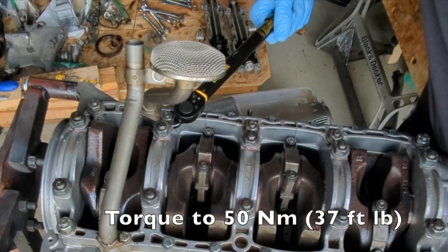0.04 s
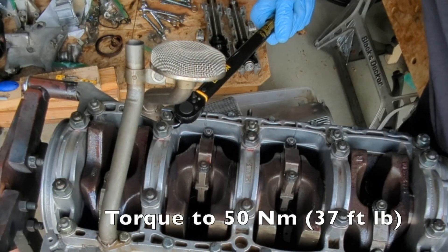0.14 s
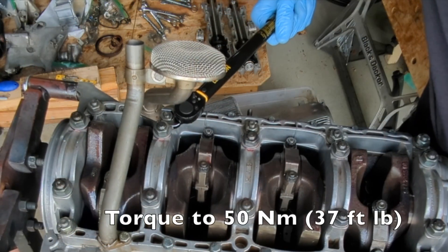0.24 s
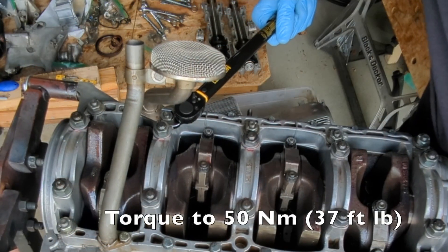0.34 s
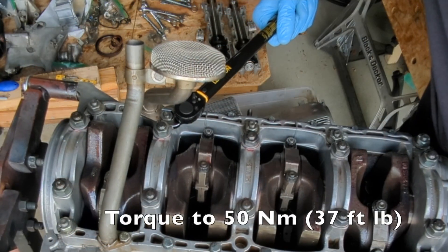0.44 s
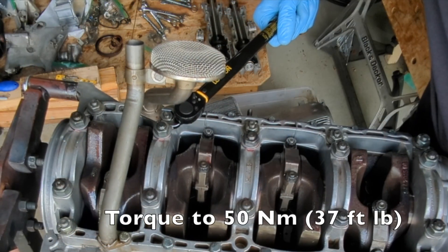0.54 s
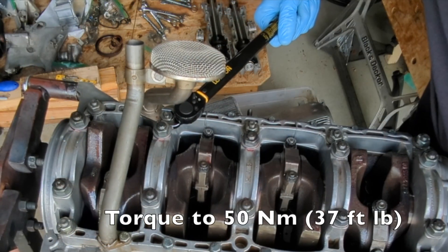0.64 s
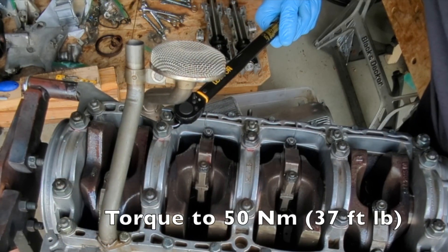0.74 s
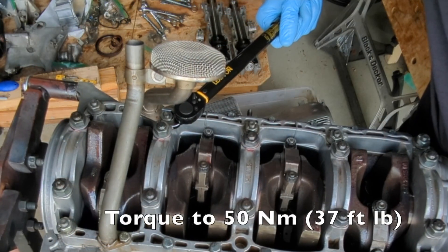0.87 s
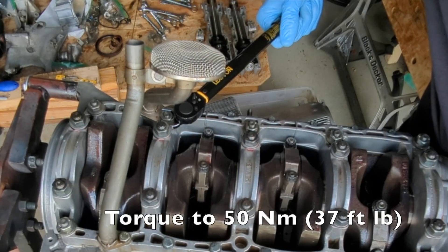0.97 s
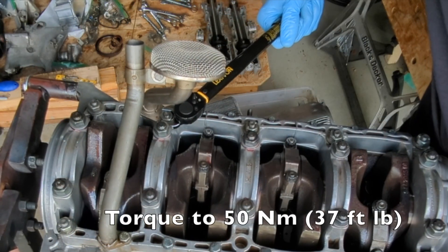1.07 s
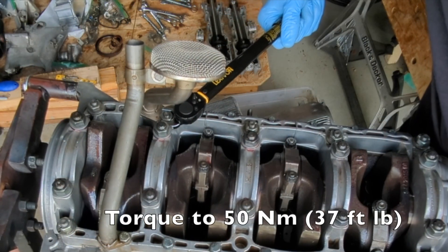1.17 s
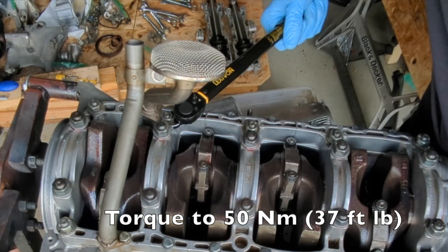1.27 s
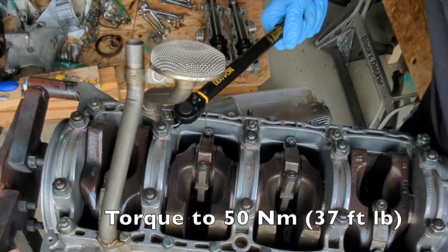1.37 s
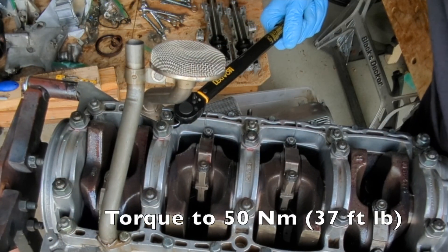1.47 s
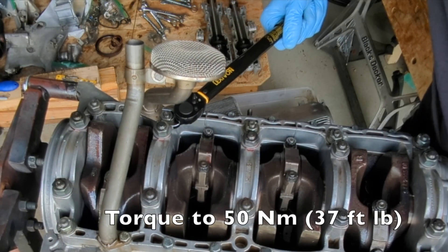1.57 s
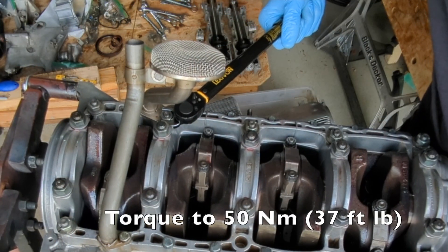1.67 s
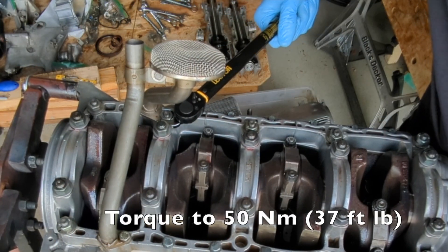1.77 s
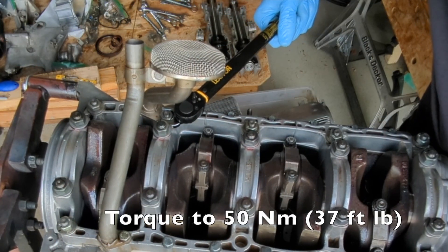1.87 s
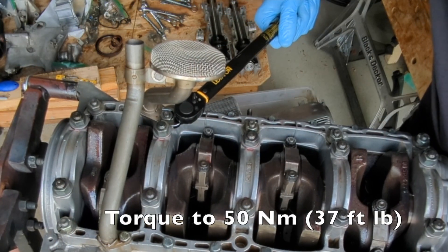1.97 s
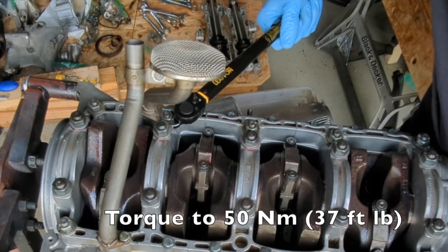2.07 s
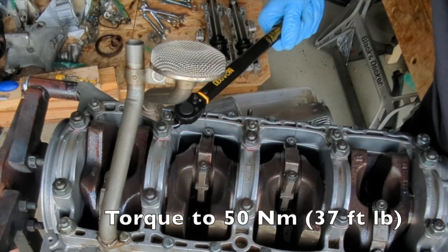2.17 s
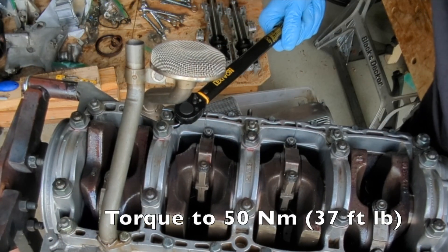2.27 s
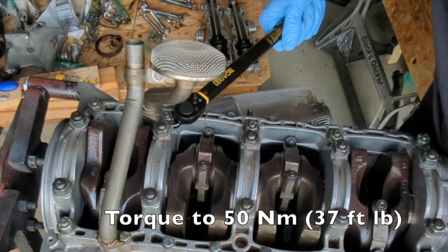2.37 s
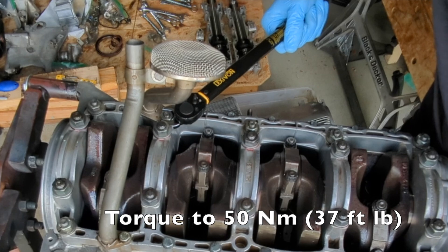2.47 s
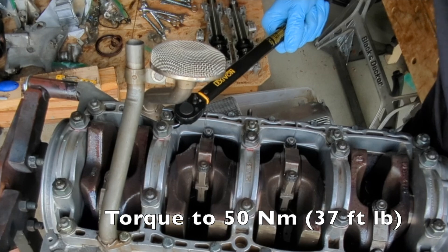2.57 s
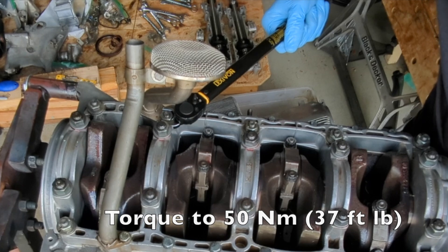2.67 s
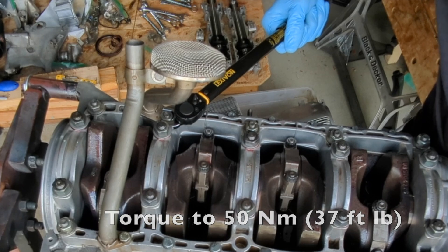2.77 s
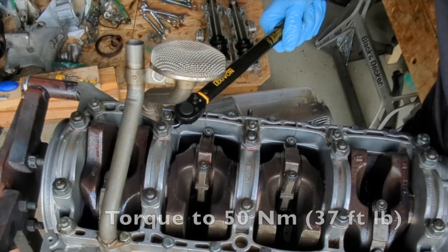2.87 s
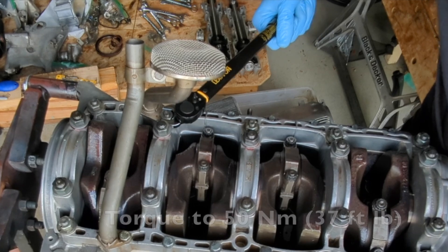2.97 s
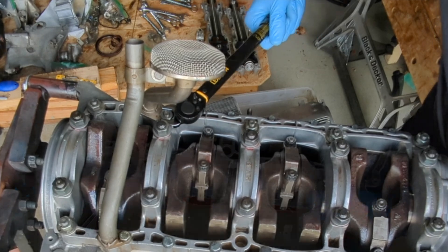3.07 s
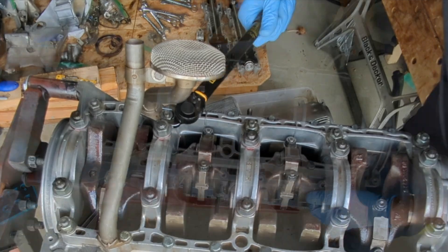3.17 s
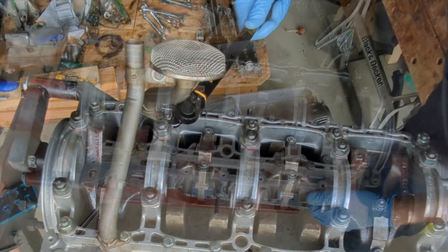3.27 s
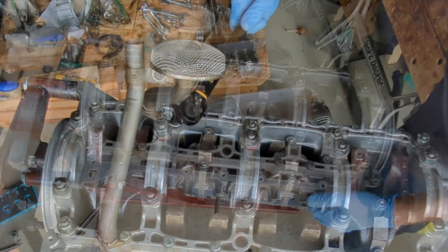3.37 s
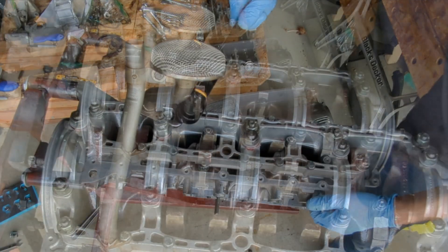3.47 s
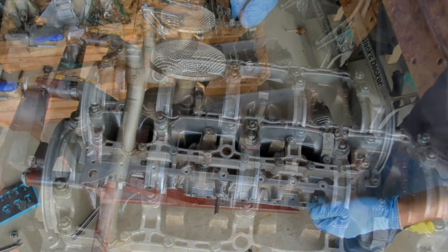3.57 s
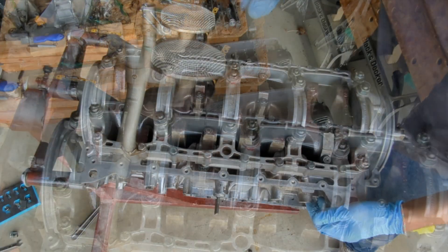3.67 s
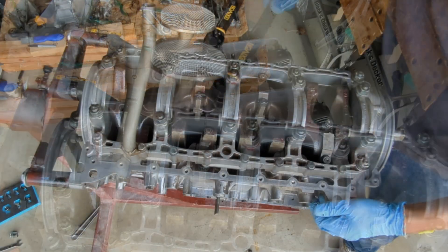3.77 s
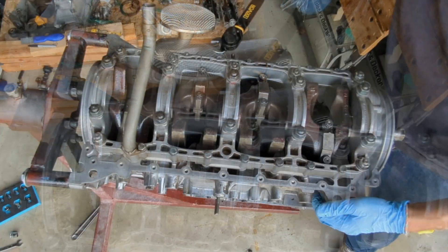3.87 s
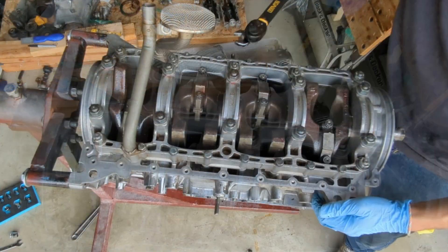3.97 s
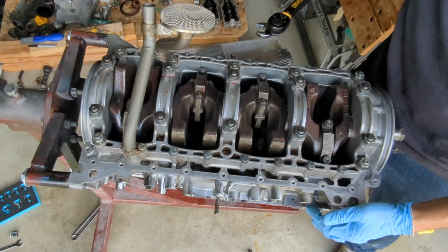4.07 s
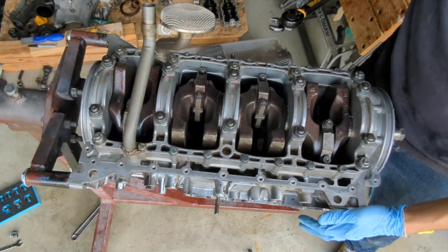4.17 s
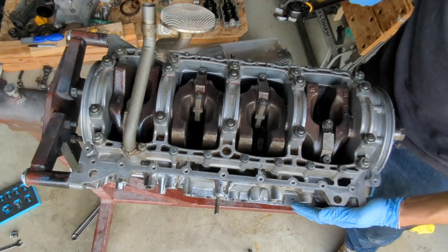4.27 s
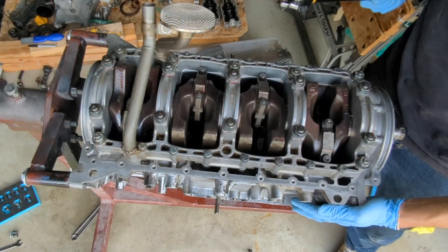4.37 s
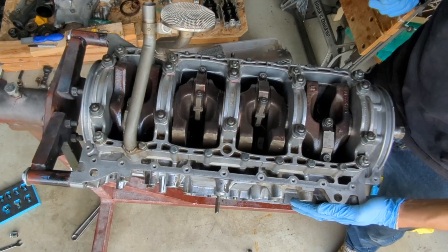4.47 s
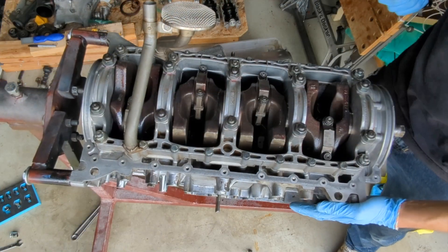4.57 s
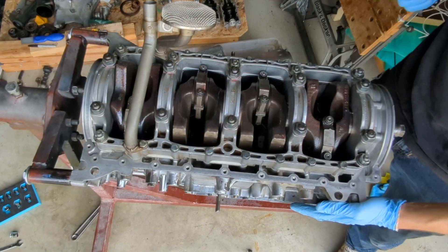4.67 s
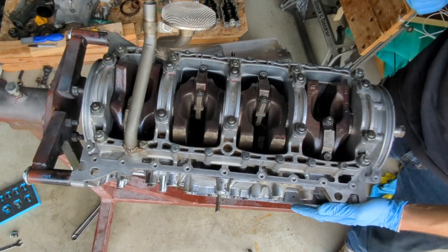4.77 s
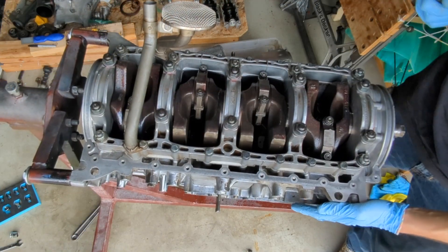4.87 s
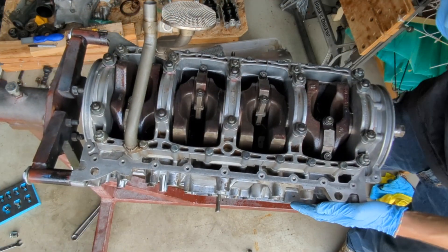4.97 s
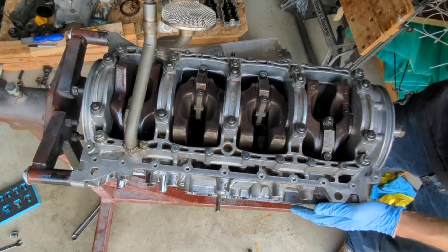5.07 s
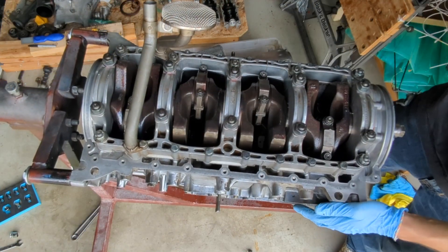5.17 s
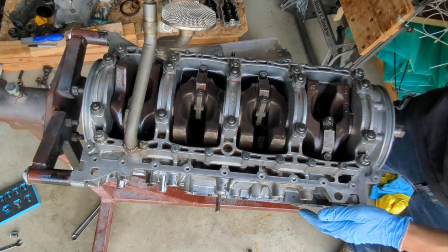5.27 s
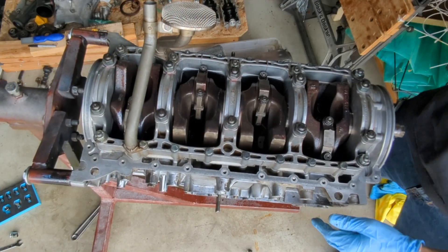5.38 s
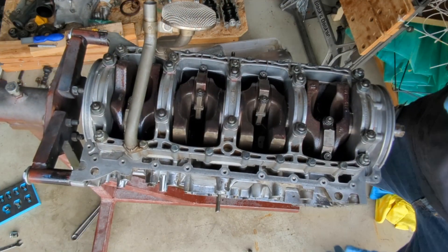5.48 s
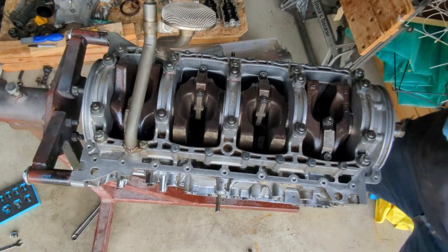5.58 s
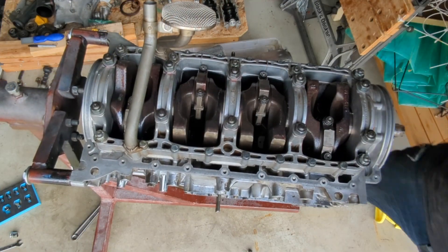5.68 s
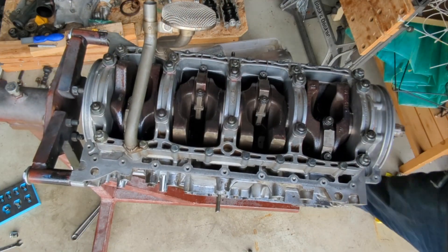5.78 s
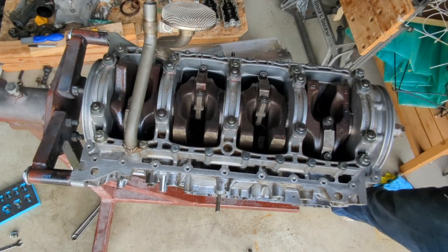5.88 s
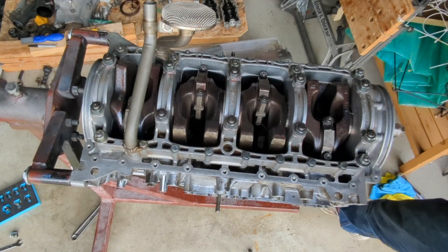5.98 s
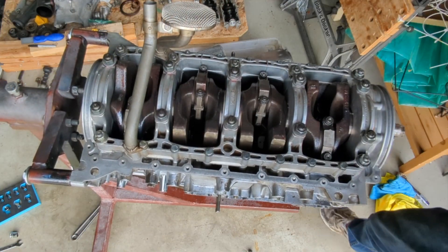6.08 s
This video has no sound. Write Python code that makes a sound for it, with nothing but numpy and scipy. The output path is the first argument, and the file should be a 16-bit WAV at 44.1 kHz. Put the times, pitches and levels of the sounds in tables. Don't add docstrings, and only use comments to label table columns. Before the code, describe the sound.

A low machine hum beats slowly beneath soft rumble and air noise. After a faint dull knock, a torque wrench on an engine block, close and to the right, snaps twice about a second apart, each crack bright with a short metallic ring and a soft dull reset. Then gloves and clothing scuff, small parts tick, and low knocks and shoe scrapes end it, in a modestly echoing workshop.

```python
import sys
import numpy as np
from scipy import signal
from scipy.io import wavfile
from scipy.ndimage import uniform_filter1d

SR = 44100
rng = np.random.default_rng(int(sys.argv[2]) if len(sys.argv) > 2 else 0)


def transcribe(u):
    v = np.clip(np.atleast_2d(u).T, -1, 1)
    q = np.round(v * 32767).astype(np.int16)
    wavfile.write(sys.argv[1], SR, q)


def to_linear_factor(level_db):
    exponent = np.asarray(level_db, float) / 20
    return 10 ** exponent


N = 270333


def evened(x):
    return x / np.sqrt(np.mean(x ** 2) + 1e-20)


def struck(x):
    return x / np.sqrt(np.mean(x[..., :350] ** 2))


def read(points, hz):
    f, value = np.transpose(points)
    return np.interp(np.log(hz + 1), np.log(f + 1), value)


def add(mix, start_s, sound):
    part = mix[:, round(start_s * SR):][:, :sound.shape[1]]
    part += sound[:, :part.shape[1]]


def lean(pan_db):
    return to_linear_factor(np.array([[pan_db / 2], [-pan_db / 2]]))


def colour(x, *spectra):
    hz = abs(np.fft.fftfreq(4096, 1 / SR))
    gain_db = sum(read(s, hz) for s in spectra)
    log_gain = np.log(to_linear_factor(np.maximum(gain_db, -100)))
    taps = np.fft.ifft(np.exp(np.conj(signal.hilbert(log_gain)))).real[:2048]
    return signal.oaconvolve(x, taps)[:len(x)]


def colour_both(x, *spectra):
    return np.array([colour(v, *spectra) for v in x])


def resonate(x, hz, width):
    r = np.exp(-np.pi * width / SR)
    feedback = [1, -2 * r * np.cos(2 * np.pi * hz / SR), r * r]
    return signal.lfilter([(1 - r * r) / 2, 0, (r * r - 1) / 2], feedback, x)


def resonate_twice(x, hz, width):
    return resonate(resonate(x, hz, width), hz, width)


def wander(rate):
    t = np.arange(0, N + 256, 256) / SR
    rates = np.geomspace(rate / 10, rate, 12)
    slow = sum(np.sin(2 * np.pi * (f * t + rng.random())) / np.sqrt(f) for f in rates)
    return np.interp(np.arange(N) / SR, t, evened(slow))


def burst(t, rise, t60):
    return rng.standard_normal((2, len(t))) * (1 - np.exp(-t / rise)) * to_linear_factor(-60 * t / t60)


# (time [s], speed [Hz])
MOTOR_SPEED = [(0, 58.585), (1.9, 58.585), (2.1, 58.7), (6.13, 58.7)]
# (multiple of shaft speed, level [dB])
MOTOR_TONES = [(1, -67.5), (3, -78.5), (4, -75.5), (5, -80), (6, -82), (8, -82.5), (9, -81.5), (10, -86),
               (11, -82.5)]


def hum():
    t = np.arange(N) / SR
    shaft_turns = np.cumsum(np.interp(t, *np.transpose(MOTOR_SPEED))) / SR + .334
    apart = np.array([[.012], [-.012]])
    mains_hz, mains_turn, mains_db = 119.94, .18, -51.3
    out = to_linear_factor(mains_db) * np.cos(2 * np.pi * (mains_hz * t + mains_turn + apart))
    throb_db = -61.5 + 4 * np.cos(2 * np.pi * (t - 1.2) / 1.5)
    out += to_linear_factor(throb_db) * np.cos(2 * np.pi * (2 * shaft_turns - apart))
    for k, db in MOTOR_TONES:
        level = to_linear_factor(db + 2.0 * wander(1.5))
        turns = k * shaft_turns + 0.078 * wander(.8) + rng.random()
        out += level * np.cos(2 * np.pi * turns)
    return np.sqrt(2) * out * lean(-.3)


# (pitch [Hz], likeness [-1 to 1])
LIKENESS = [(60, 0.97), (130, 0.98), (290, 0.84), (640, 0.27), (1410, -0.19), (3100, 0.08), (6820, -0.01),
            (15000, 0.03)]
# (pitch [Hz], left minus right [dB])
BALANCE = [(60, -1.0), (180, -0.5), (550, -1.5), (1650, -2.0), (4970, -4.0), (15000, -2.5)]


def diffuse(spectra, patchy_db):
    hz = np.fft.rfftfreq(2048, 1 / SR)
    a, b, c, d, patches = rng.standard_normal((N // 512 + 5, 1025, 5)).T
    patches = uniform_filter1d(patches, size=15, axis=0)
    patches = evened(uniform_filter1d(patches, size=6, axis=1))
    same = np.clip(read(LIKENESS, hz), -1, 1)[:, None]
    left = a + 1j * b
    right = same * left + np.sqrt(1 - same ** 2) * (c + 1j * d)
    z = np.array([left * to_linear_factor(read(BALANCE, hz))[:, None], right])
    power = sum(to_linear_factor(read(s, hz)) ** 2 for s in spectra)
    z *= np.sqrt(power)[:, None] * to_linear_factor(patchy_db * patches)
    return evened(signal.istft(z, nperseg=2048, noverlap=1536)[1][:, :N])


# (pitch [Hz], level [dB per Hz])
RUMBLE = [(20, -36), (32, -22), (46, -19), (58, 3), (67, -1), (77, -1.5), (88, 4), (104, -0.5), (140, -7.5),
          (175, -4.5), (205, -14), (260, -24), (400, -57.5)]
# (pitch [Hz], level [dB per Hz])
AIR = [(200, -38.5), (300, -34), (450, -24.5), (800, -15.5), (1200, -19.5), (1600, -28.5), (2600, -39),
       (5000, -47), (9000, -56.5), (14000, -58)]


def workshop_air():
    return to_linear_factor(-57) * diffuse([RUMBLE, AIR], 0.27)


# (time [s], level [dB], brightness [dB])
OUTSIDE = [(0, -69.5, -4), (.6, -65.5, -7.5), (1.2, -62.5, -7.5), (1.999, -62.5, -4.5),
           (2.801, -60.5, -7.5), (3.7, -60, -1), (4.2, -60, -6.5), (5, -61, 1), (5.6, -58, -3),
           (6.13, -60.5, 0)]
# (pitch [Hz], level [dB per Hz])
WASH = [(160, -39), (270, -11.5), (469, -1.5), (660, -8.5), (688, -9.5), (967, -5.5), (1160, -11.5),
        (1250, -7.5), (2760, -18), (8000, -37.5), (10400, -75), (17600, -120)]


def wash():
    time_s, *curves = np.transpose(OUTSIDE)
    level_db, bright_db = (np.interp(np.arange(N) / SR, time_s, c) for c in curves)
    far = diffuse([WASH], 1.2)
    low = signal.sosfilt(signal.butter(2, 1500, fs=SR, output="sos"), far)
    return to_linear_factor(level_db) * (low + to_linear_factor(bright_db) * (far - low))


# (pitch [Hz], level [dB])
HISS = [(1000, -81), (6000, -93.5), (10000, -89.5), (13200, -89), (13700, -108), (16500, -125)]


def camera_noise(shape):
    t = np.arange(60) / SR
    leak = colour_both(rng.standard_normal(shape), HISS)
    for s in np.arange(.1558, N / SR, .16):
        tick = resonate_twice(burst(t, .0002, .006), 11300, 5000)
        add(leak, s, to_linear_factor(-81) * evened(tick))
    return leak


# (time [s], level [dB], main pitch [Hz], t60 [s], left minus right [dB])
TICKS = [(3.059, -67, 5660, 0.017, -12), (3.278, -55, 2030, 0.045, -3.5), (3.37, -57.5, 7900, 0.016, -10),
         (3.372, -46.5, 2020, 0.017, -4), (3.409, -67, 4500, .02, -5.5), (3.5057, -54, 3170, 0.018, -14),
         (4.096, -74.5, 9900, 0.025, -10.5), (4.228, -63.5, 5750, 0.021, -12),
         (4.8106, -50, 2400, 0.037, -5), (4.884, -60.5, 6000, 0.018, -13), (4.885, -53, 1780, .03, -7),
         (5.608, -54, 5860, 0.013, -13), (5.757, -66, 9550, 0.048, -2)]
# (time [s], level [dB], main pitch [Hz], t60 [s], left minus right [dB])
KNOCKS = [(.365, -56, 700, 0.031, -1), (3.713, -47.5, 530, .07, -8), (3.73, -51, 560, 0.038, 0),
          (5.464, -45.5, 1270, 0.071, -1), (5.6021, -41.5, 494, 0.056, -2), (5.603, -46.5, 1870, 0.021, 2),
          (5.62, -45, 1190, 0.044, 1), (5.69, -48, 374, 0.057, -2), (5.66, -55, 218, 0.27, 0),
          (5.755, -51, 264, 0.22, 0), (5.9, -51.5, 282, 0.4, -1), (6.01, -52, 240, 0.32, -1),
          (5.762, -46, 483, .06, -2), (5.769, -51, 1310, 0.036, -5)]


def ticks():
    out, t = np.zeros((2, N)), np.arange(4000) / SR
    for s, db, hz, t60, pan_db in TICKS + KNOCKS:
        touch = burst(t, .0002, t60)
        touch = touch + 0.58 * touch[::-1]
        edge = resonate_twice(touch, 8000, 6500)
        body = resonate_twice(touch, hz, 0.48 * hz)
        edge_db = -2.5 + 12 * min(np.log2(hz / 6500), 0)
        contact = body / abs(body).max() + to_linear_factor(edge_db) * edge / abs(edge).max()
        add(out, s, to_linear_factor(db - 1) * lean(pan_db) * contact)
    return out


# (pitch [Hz], t60 [s])
ECHO = [(500, 0.21), (1300, 0.56), (3000, 0.47), (5500, 0.34), (11000, 0.23)]


def shop(x):
    taps = np.zeros((2, SR // 2))
    slots = np.arange(180, SR // 2 - 20, 20)
    at = slots + rng.integers(0, 20, (2, len(slots)))
    np.put_along_axis(taps, at, rng.choice([-1., 1.], at.shape), 1)
    hz, t, z = signal.stft(taps, SR, nperseg=256)
    fade = to_linear_factor(-60 * t / read(ECHO, hz)[:, None])
    tail = signal.istft(z * fade, SR, nperseg=256)[1]
    return signal.fftconvolve(x, tail / np.linalg.norm(tail[0]), axes=1)[:, :N]


# (pitch [Hz], level [dB])
SHADOW = [(60, -0.5), (150, -1.0), (380, -1.5), (950, -3.5), (2380, -5.5), (5980, -9.5), (15000, -9.5)]
# (pitch [Hz], level [dB])
CAPSULE = [(12500, 0), (13500, -1), (14300, -11), (15700, -18), (16500, -30)]


def ports(x):
    return np.array([colour(x[0], SHADOW, CAPSULE), colour(x[1], CAPSULE)])


SLIP_S = .0016
# (pitch [Hz], width [Hz], level [dB])
HEAD = [(1100, 150, -10), (2900, 150, -2), (3330, 120, 0), (3680, 130, -4), (4610, 200, -9), (5240, 90, -9),
        (5470, 110, -7), (7310, 110, -2), (8320, 110, -10), (9220, 110, -13), (10200, 110, -9),
        (10900, 300, -8), (12200, 90, -8), (12900, 130, -7)]
# (pitch [Hz], level [dB], t60 [s])
BLOCK = [(330, -10, .2), (430, -9, .22), (530, -12, .2), (1090, -9, .2), (1236, -8, .35), (1292, -6, .45),
         (1500, -12, .2), (1825, -15, .3), (2630, -9, .3), (2810, -6, .4), (2952, -4, .45), (3082, -5, .55),
         (3216, -4, .46), (3338, -2, .38), (3367, -5, .45), (3560, -8, .3), (3595, -3, .25),
         (3711, -4, .25), (4005, -11, .2), (4500, -12, .2), (5243, -14, .28), (5319, -15, .28),
         (6150, -13, .22), (7233, -4, .14), (7477, -10, .22), (8516, -15, .2), (10040, -13, .18),
         (11480, -13, .2), (12145, -4, .1), (12800, -10, .12)]
# (pitch [Hz], level [dB per Hz])
CRACK = [(120, -39), (250, -17), (550, -19), (1080, -1.5), (1900, -9.5), (2550, -12), (3310, 5.5),
         (4040, -7.5), (5420, -5), (6400, -11), (7300, -4), (9000, -11), (12600, -8.5), (15000, -16.5)]


def snap(blow_db, tilt_db, ring_db):
    t = np.arange(round(.6 * SR)) / SR
    late = np.maximum(t - SLIP_S, 0)
    crack = colour_both(burst(late, 0.0006, 0.038), CRACK, [(2000, 0), (12000, tilt_db)])
    chatter = burst(t, 0.0022, 0.038)
    tick = burst(late, .0001, 0.0076) + to_linear_factor(-14.5) * chatter
    tick = resonate_twice(tick, 12500, 5000)
    swing = burst(late, .001, .016)
    head = sum(to_linear_factor(db) * resonate(swing, hz, 1.4 * width) for hz, width, db in HEAD)

    hz, db, t60 = np.transpose(BLOCK)[:, :, None]
    spread_db = 1.5 * rng.standard_normal((2, len(hz), 1))
    start = rng.random(hz.shape) + np.minimum(hz / 1500, 1) * rng.random(spread_db.shape)
    fade = to_linear_factor(db + spread_db - 60 * late / (0.75 * t60))
    modes = fade * np.sin(2 * np.pi * (hz * late + start))
    ring = modes.sum(1) * (1 - np.exp(-late / 0.0029))

    blow = struck(crack) + to_linear_factor(-3.0) * struck(head) + to_linear_factor(-7.0) * struck(tick)
    return ports(to_linear_factor(blow_db) * blow + to_linear_factor(ring_db) * ring)


# (pitch [Hz], level [dB per Hz])
RESET = [(250, -7), (450, 1.5), (1100, 4), (2200, -3), (3200, -5.5), (4000, -15), (4600, -25), (9000, -38),
         (14000, -55)]


def reset(db):
    knock = burst(np.arange(4000) / SR, 0.00042, 0.048)
    knock = colour_both(knock + .5 * knock[::-1], RESET)
    return to_linear_factor(db) * ports(struck(knock))


# (time [s], blow [dB], treble tilt [dB], ring [dB])
SNAPS = [
    (1.2380, -23.5, 3, -38.5),
    (2.4630, -23.5, 2, -39.5),
]
# (time [s], level [dB])
RESETS = [
    (1.7141, -50.5),
    (1.723, -57.5),
    (1.7316, -59),
    (2.8924, -49.5),
    (2.8988, -53),
    (2.912, -60),
]


def wrench():
    out = np.zeros((2, N))
    for s, *row in SNAPS:
        add(out, s - SLIP_S, snap(*row))
    for s, db in RESETS:
        add(out, s, reset(db))
    return out


# (pitch [Hz], level [dB per Hz])
GRIT = [(600, -42), (1100, 2.5), (1700, 5), (2400, 1), (3300, -2.5), (4800, -7), (6000, -23.5), (9000, -30)]
# (pitch [Hz], level [dB per Hz])
FINE = [(2500, -22), (4000, -0.5), (5200, 0.5), (6500, 2), (8000, -4), (9500, 0), (12000, -2.5),
        (14000, -9), (15650, -7), (15950, -43)]


def scuff(stroke, press_db, grit_hz, fine_db, pan_db, body_db, tint):
    catches = to_linear_factor(1.4 * np.repeat(np.minimum(rng.exponential(1, SR // 60), 3), 60))
    slips, fibres = (rng.standard_normal((2, 2, SR)) * catches)[..., :len(stroke)]
    slips = slips + 0.046 * slips[::-1]
    broad = evened(colour_both(slips, GRIT))
    fine = evened(colour_both(fibres, FINE))
    grit = evened(broad + tint * evened(resonate_twice(slips, grit_hz, 1100)))
    body = evened(resonate_twice(slips + 1.1 * slips[::-1], 330, 600))
    hiss = lean(pan_db) * to_linear_factor(fine_db) * stroke ** 1.07 * fine
    thud = to_linear_factor(body_db) * stroke ** 0.63 * body
    return to_linear_factor(press_db) * (np.sqrt(lean(pan_db)) * stroke * grit + hiss + thud)


def drag(start, hold):
    t = np.arange(round((hold + .15) * SR)) / SR
    catch = np.minimum(t / .021, 1)
    return start, catch * to_linear_factor(-350 * np.maximum(t - hold, 0))


def swipe(peak, half):
    u = np.arange(-round(3 * half * SR), round(5 * half * SR)) / (half * SR)
    loss_db = np.where(u < 0, 10, 7)
    return peak - 3 * half, to_linear_factor(-loss_db * abs(u) ** 1.5)


# (left minus right [dB], dull body [dB], strength of the grit colour [ratio])
GLOVE = (-7, -13, 0.98)
CLOTH = (-10.5, -12.5, 0.54)
SEAM = (-13.5, -16, 1.9)
SHOE = (-1, -5.5, 1.2)
SHIFT = (-10.5, .1, 0.63)
# (what, start [s], hold [s], pressure [dB], grit colour [Hz], fine hiss [dB])
DRAGS = [(SHIFT, 2.7, .55, -78.5, 2000, -13.5), (SHIFT, 3.34, 0.072, -68.5, 1900, -23),
         (GLOVE, 3.508, .165, -52.5, 2240, -14), (SHIFT, 3.7, .04, -64, 2100, -13),
         (SHIFT, 3.8, .75, -72.5, 2030, -20), (SHIFT, 4.6, .45, -74.5, 2060, -20),
         (SHIFT, 5.06, .5, -70, 2500, -17), (SEAM, 5.197, 0.03, -62, 4350, -17),
         (CLOTH, 5.33, 0.036, -63.5, 2100, -12), (CLOTH, 5.4, .04, -65, 2100, -6),
         (SHOE, 5.61, .16, -62.5, 1930, -13), (SHOE, 5.79, .4, -66, 2050, -10)]
# (what, peak [s], half width [s], pressure [dB], grit colour [Hz], fine hiss [dB])
SWIPES = [
    (GLOVE, 3.656, .025, -51.5, 2400, -2.5),
    (CLOTH, 5.078, .028, -57.5, 3550, -12),
    (CLOTH, 5.272, .036, -57.5, 3030, -4.5),
    (CLOTH, 5.463, .027, -55.5, 2200, -8.5),
    (SHOE, 5.76, .04, -69, 2500, -2),
    (SHOE, 5.905, .06, -67.5, 2300, -.1),
    (SHOE, 6.12, .08, -68.5, 2800, .1),
]


def rubbing():
    out = np.zeros((2, N))
    for rows, shape in ((DRAGS, drag), (SWIPES, swipe)):
        for what, s, length, *row in rows:
            start, stroke = shape(s, length)
            add(out, start, scuff(stroke, *row, *what))
    return out


def scene():
    steady = hum() + workshop_air() + wash()
    small, tool, rubs = ticks(), wrench(), rubbing()
    room = shop(to_linear_factor(-9.5) * tool + to_linear_factor(-5) * small + to_linear_factor(-12) * rubs)
    return tool + small + rubs + room + steady


def roll_off(x):
    return signal.sosfilt(signal.butter(12, 16510, fs=SR, output="sos"), x)


def record(dry):
    mix = dry + camera_noise(dry.shape)
    return roll_off(mix)


dry = scene()
out = record(dry)
transcribe(out)
```